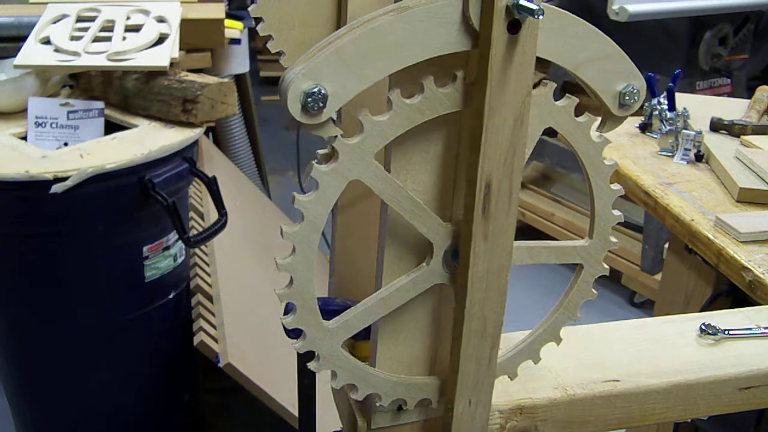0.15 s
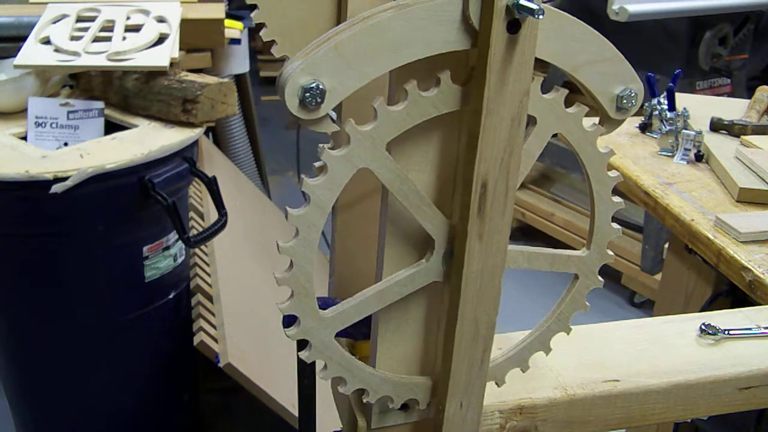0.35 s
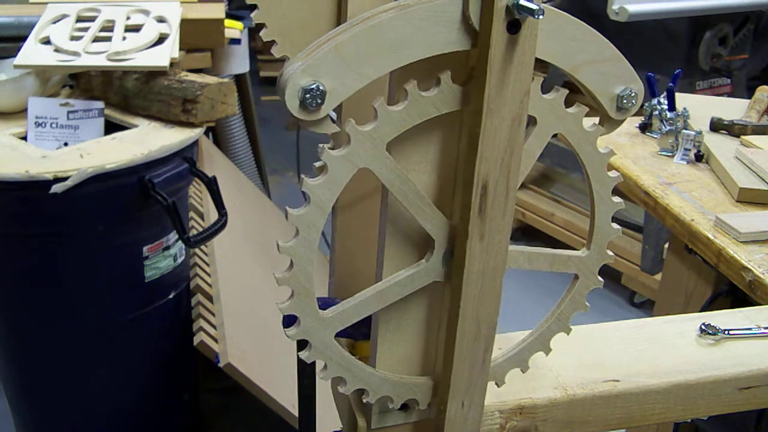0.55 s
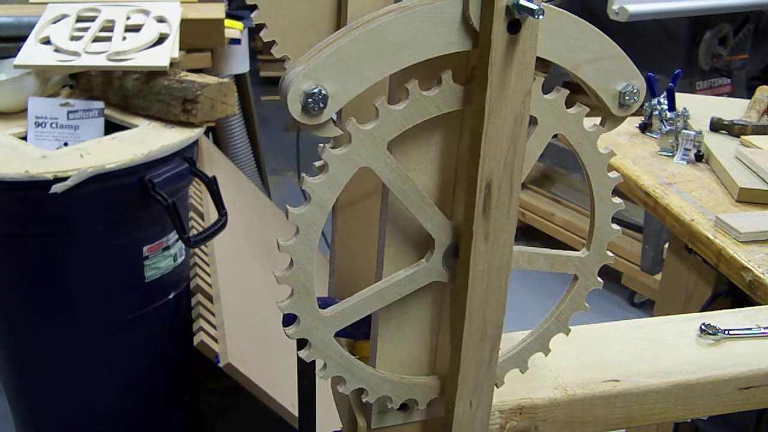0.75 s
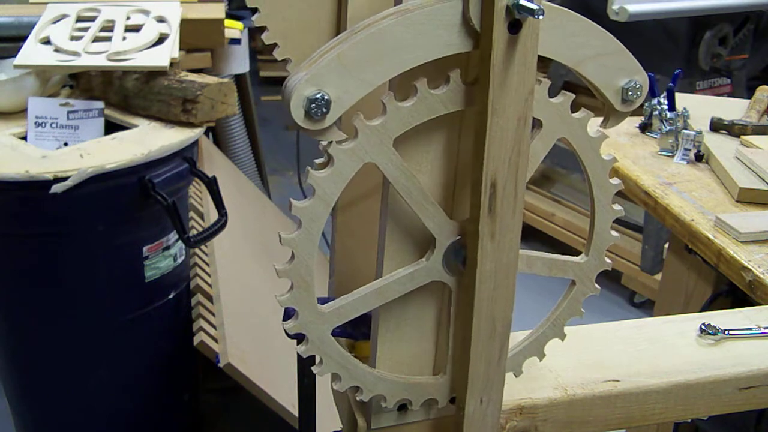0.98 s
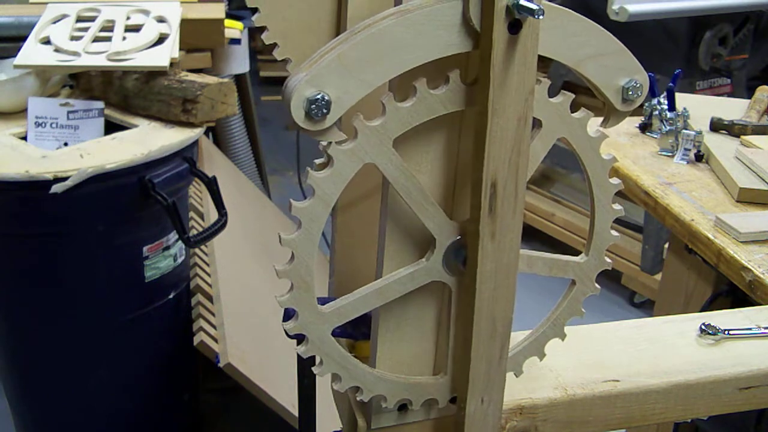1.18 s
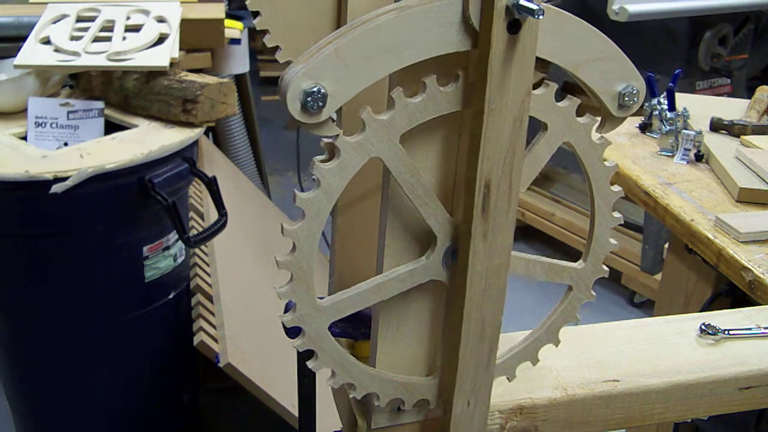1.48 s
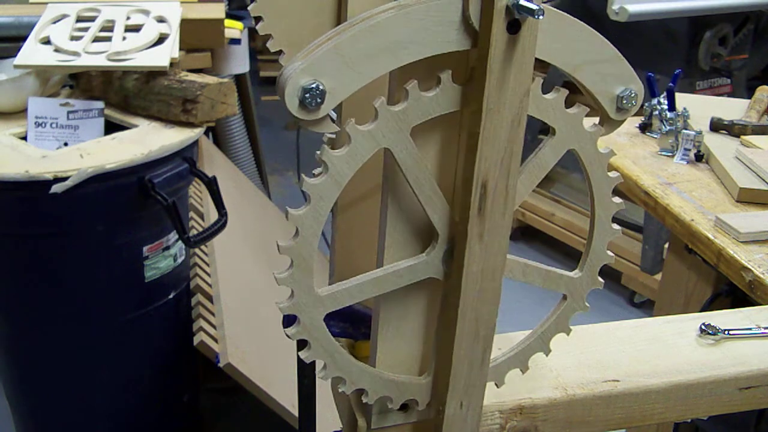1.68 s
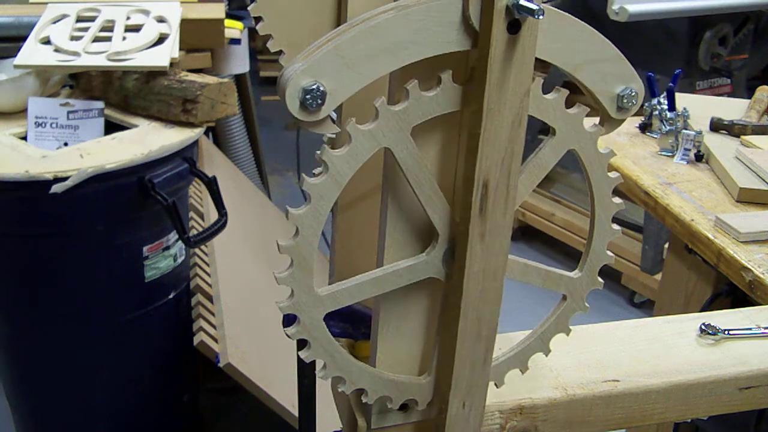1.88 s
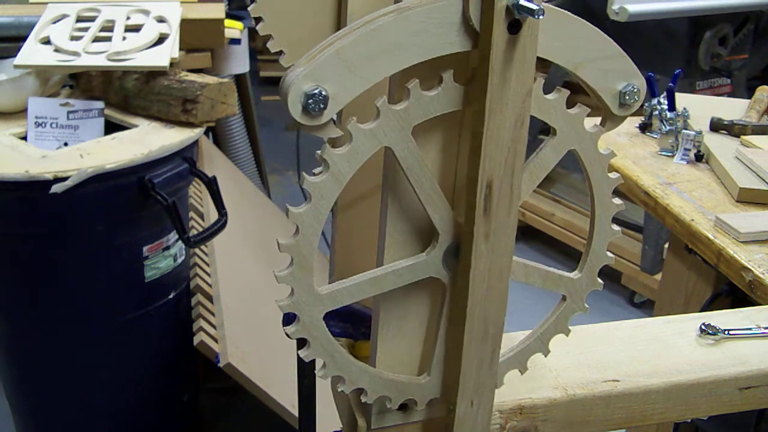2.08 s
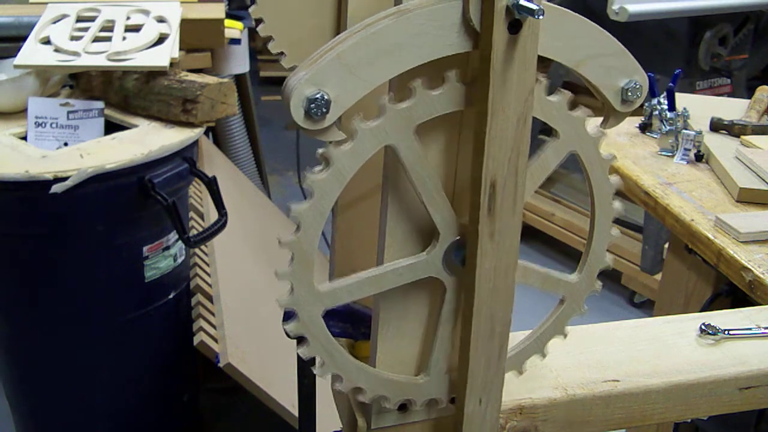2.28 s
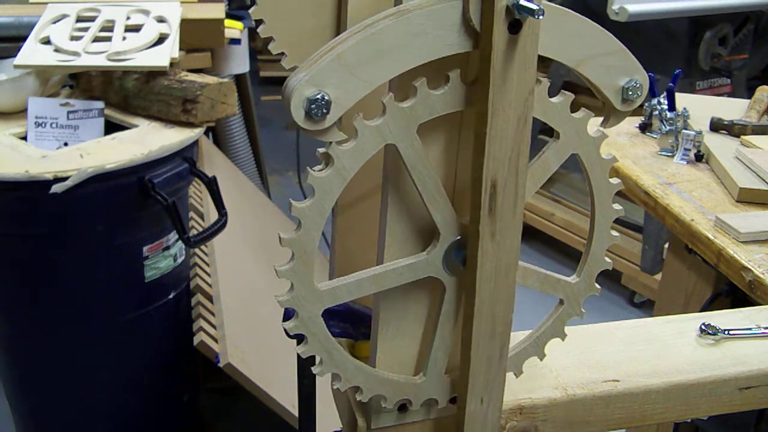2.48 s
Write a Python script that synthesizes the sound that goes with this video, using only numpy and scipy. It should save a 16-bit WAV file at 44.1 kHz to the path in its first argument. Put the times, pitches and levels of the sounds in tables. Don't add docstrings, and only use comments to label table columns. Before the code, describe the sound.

A big wooden gear knocks against its anchor four times, about 0.7 seconds apart, each a rattling clack with a soft low thud; one faint squeak follows the third. Close microphone, quiet workshop with low ventilation hum.

```python
import sys
import numpy as np
from scipy import signal
from scipy.fft import irfft
from scipy.io import wavfile
from scipy.ndimage import uniform_filter1d

SR = 44100
rng = np.random.default_rng(int(sys.argv[2]) if len(sys.argv) > 2 else 0)


def ratio_of_db(decibels):
    return 10 ** (np.asarray(decibels, float) / 20)


def to_wav(s):
    ch = np.atleast_2d(s).T
    pcm = np.round(np.clip(ch, -1, 1) * 32767)
    wavfile.write(sys.argv[1], SR, pcm.astype(np.int16))


N = 116865

FOCUS_DB = 5


def evened(x):
    return x / np.sqrt(np.mean(x ** 2) + 1e-20)


def read(points, hz):
    f, value = np.transpose(points)
    return np.interp(np.log(hz + 1), np.log(f + 1), value)


def add(mix, start_s, sound):
    part = mix[round(start_s * SR):][:len(sound)]
    part += sound[:len(part)]


def landings():
    # start_s, peak_db, focus_hz (most excited pitch)
    chatter = [
        [(.2392, -24, 2400), (.2404, -23, 2000), (.2427, -16.5, 1430), (.2452, -27, 2600), (.2470, -45, 2500),
         (.2486, -18, 1650), (.2512, -25, 2520), (.2535, -34.5, 2560), (.2550, -41, 1000)],
        [(.9773, -34, 3500), (.9789, -28, 1130), (.9808, -31.5, 2450), (.9824, -29, 3320), (.9838, -26.5, 730),
         (.9858, -27.5, 1500), (.9880, -31.5, 750), (.9903, -33, 890), (.9921, -31.5, 2400), (.9940, -40, 3910)],
        [(1.5629, -34.5, 2600), (1.5641, -14.5, 4720), (1.5652, -26.5, 3030), (1.5662, -22, 2000),
         (1.5705, -27, 940), (1.5770, -33, 1470), (1.5810, -43, 3000)],
        [(2.3279, -39.5, 1230), (2.3301, -31.5, 2000), (2.3318, -31.5, 744), (2.3330, -30, 3620),
         (2.3356, -31, 820), (2.3402, -46, 1190), (2.3420, -38, 5000), (2.3445, -38.5, 4200),
         (2.3480, -41, 935), (2.3525, -42.5, 4200)],
        [(.6243, -44.5, 2000), (.6272, -43, 2500), (.6300, -54, 2000), (.6325, -49, 2450), (.6365, -44, 2960),
         (.6395, -52, 1800), (.6450, -62, 2500)],
    ]
    teeth = [
        [0, -8, -2.5, -6, -8, -8.5, -13, -10, -13, -18, -17, -11, -14, -14.5],
        [0, -9.5, -11, -10, -11.5, -15.5, -15, -16, -19.5, -26.5, -30.5, -21.5, -22, -20.5],
        [2.5, -1, 4, 1.5, -1.5, -15.5, -6.5, -16.5, -16.5, -8.5, -28, -16.5, -12.5, -17.5],
        [2, -8.5, -4, -7, -7.5, -2, -11.5, -1, -8, -45.5, -21, -13.5, -8, -20],
        [11.5, -2.5, -1.5, 0, -6.5, -3.5, -14.5, -19, -27, -32, -28, -19.5, -21, -20.5],
    ]
    aside = [0, 1, -6.5, -1.5, -2]
    aside_hz, floor_hz = 3500, 280
    spread_s = 0.0022
    out = np.zeros((2, N))
    treble_filter = signal.butter(2, aside_hz, "high", fs=SR)
    for contacts, levels_db, aside_db in zip(chatter, teeth, aside):
        for start_s, peak_db, focus_hz in contacts:
            sound = ratio_of_db(peak_db) * blow(levels_db, focus_hz, spread_s)
            treble = signal.filtfilt(*treble_filter, sound)
            add(out[0], start_s - spread_s / 4, sound)
            add(out[1], start_s, sound + (ratio_of_db(aside_db) - 1) * treble)
    return signal.sosfilt(signal.butter(2, floor_hz, "high", fs=SR, output="sos"), out)


def blow(levels_db, focus_hz, spread_s):
    # pitch_hz, width_hz
    wheel = [(715, 39), (900, 138), (1430, 65), (1660, 62), (2020, 62), (2550, 78), (2920, 190),
             (3600, 280), (4150, 510), (4750, 270), (5400, 150), (6000, 120), (6480, 160), (7100, 740)]
    minor_db, ripple_db = -14, 3
    hz = np.fft.rfftfreq(4096, 1 / SR)
    f, width_hz = np.transpose(wheel)
    resonance = 1 / (1 + (2 * (hz[:, None] - f) / width_hz) ** 2)
    clear = (ratio_of_db(levels_db) ** 2 * resonance).sum(axis=1)
    bed = ratio_of_db(read(list(zip(f, levels_db)), hz) + minor_db) ** 2
    ripple = evened(uniform_filter1d(rng.standard_normal(len(hz)), size=14))
    focus_loss_db = FOCUS_DB * np.log2((hz + 20) / focus_hz) ** 2
    gain = np.sqrt(clear + bed) * ratio_of_db(ripple_db * ripple - focus_loss_db)

    log_gain = np.log(np.concatenate([gain, gain[-2:0:-1]]) + 1e-6)
    prompt = np.exp(np.conj(signal.hilbert(log_gain)))[:len(hz)]

    band = np.minimum(hz // 300, 29).astype(int)
    late_s = spread_s * rng.random(30)[band] ** 2
    lag = 2 * np.pi * hz[1] * np.cumsum(uniform_filter1d(late_s, size=25))
    return irfft(prompt * np.exp(-1j * lag))[:3000] / abs(irfft(prompt)).max()


def thuds():
    # start_s, level_db, rise_s, lowest_mode_db, upper_modes_db
    frame_blows = [
        (.250, -31.5, 0.0036, -4.5, 0.5),
        (.991, -34.5, 0.015, 1, 0),
        (1.573, -34, 0.0028, -5, -2.5),
        (2.344, -37.5, .013, 5, 4),
    ]
    # pitch_hz, level_db, t60_s
    frame_modes = [(142.4, -5.5, 0.29), (186.7, -1.5, 0.17), (218.9, -15.5, 0.12), (248.5, -16, 0.27),
                   (303.8, -9.5, 0.14), (356.3, -7.5, 0.15), (436.5, -17, 0.39), (611, -3.5, 0.056)]
    upper_hz = 240
    out, t = np.zeros(N), np.arange(SR // 2)[:, None] / SR
    hz, mode_db, t60_s = np.transpose(frame_modes)
    for start_s, level_db, rise_s, low_db, upper_db in frame_blows:
        loaded_db = mode_db + low_db * (hz == hz.min()) + upper_db * (hz > upper_hz)
        tones = np.sin(2 * np.pi * (hz * t + rng.random(len(hz))))
        modes = ratio_of_db(loaded_db - 60 * t / t60_s) * tones
        rise = 1 - np.exp(-(t / rise_s) ** 2)
        add(out, start_s, ratio_of_db(level_db) * (rise * modes).sum(axis=1))
    return out


def squeak():
    # start_s, level_db, length_s
    squeals = [(1.66, -66.5, 0.0074), (1.672, -57, 0.016), (1.686, -57, 0.012), (1.699, -57.5, 0.013),
               (1.711, -63, 0.019), (1.726, -66, .010), (1.736, -62.5, 0.0078), (1.74, -70, 0.028),
               (1.772, -64.5, 0.0086), (1.776, -68.5, .010), (1.790, -58.5, 0.004), (1.795, -62.5, 0.0064)]
    # pitch_hz, width_hz, level_db
    squeal_body = [(1660, 110, -8), (1920, 110, -10), (2535, 60, 0), (3420, 140, -16), (3800, 1200, -26),
                   (5600, 300, -29), (6700, 300, -31)]
    slip_hz, waver_share, roughness, clicks_per_s = 845, 0.03, 1.1, 3000
    loose = evened(rng.standard_normal(N) * (rng.random(N) < clicks_per_s / SR))
    waver = evened(uniform_filter1d(rng.standard_normal(N), size=300))
    cycles = np.cumsum(slip_hz * (1 + waver_share * waver)) / SR
    steady = evened(np.diff(np.floor(cycles), prepend=0))
    level = np.zeros(N)
    for start_s, level_db, length_s in squeals:
        swell = np.sqrt(np.hanning(round((length_s + 0.0035) * SR)))
        add(level, start_s - 0.002, ratio_of_db(level_db) * swell)
    return signal.oaconvolve((steady + roughness * loose) * level, ring(squeal_body))[:N]


def slips():
    # start_s, level_db, length_s
    scuffs = [(.131, -65, .01), (.210, -66, .02), (.623, -62, .02), (.921, -66, .015), (1.088, -68, .01),
              (1.162, -66, .01), (1.537, -67, .015), (1.798, -64, .01), (2.264, -67, .015)]
    # pitch_hz, width_hz, level_db
    scuff_body = [(725, 330, -15), (1530, 340, -0.5), (1920, 430, -5), (2720, 69, 3.5), (3320, 200, -3.5),
                  (4200, 350, -14.5), (5600, 230, -16), (7560, 1300, -19.5)]
    drive, t = np.zeros(N), np.arange(2000) / SR
    for start_s, level_db, length_s in scuffs:
        strength = rng.standard_normal(2000) * ratio_of_db(2.9 * rng.exponential(1, 2000))
        spray = strength * (rng.random(2000) < 0.08)
        add(drive, start_s, ratio_of_db(level_db) * evened(spray) * np.exp(-(t / length_s) ** 2))
    return signal.oaconvolve(drive, ring(scuff_body))[:N]


def ring(body, size=3000):
    t = np.arange(size)[:, None] / SR
    hz, width_hz, level_db = np.transpose(body)
    sign = (-1) ** np.arange(len(hz))
    decay = width_hz * np.exp(-np.pi * width_hz * t)
    modes = sign * ratio_of_db(level_db) * decay * np.sin(2 * np.pi * hz * t)
    return evened(modes.sum(axis=1)) / np.sqrt(size)


def shop(x):
    # pitch_hz, t60_s, level_db
    walls = [(151, 1, 6.5), (716, 0.25, -3.5), (2000, 0.25, -6), (4200, 0.24, -2), (5200, 0.37, -7.5),
             (7000, 0.14, -8.5)]
    gap_s, scatter_per_s = 0.00067, 150
    out, at = np.zeros(N), np.arange(0, SR - 20, 12)
    f, t60_s, level_db = np.transpose(walls)
    for k in range(3):
        taps = np.zeros(SR)
        taps[at + rng.integers(0, 12, len(at))] = rng.choice([-1., 1.], len(at))
        hz, t, z = signal.stft(taps, SR, nperseg=256)
        start_db = read(list(zip(f, level_db)), hz)[:, None]
        decay_s = read(list(zip(f, t60_s)), hz)[:, None]
        tail = signal.istft(z * ratio_of_db(start_db - 60 * t / decay_s), SR, nperseg=256)[1]
        tail = tail * np.clip(np.arange(len(tail)) / SR / gap_s, 0, 1) ** 2
        turn = np.cos(np.pi * (scatter_per_s * np.arange(N) / SR + k / 3))
        out += signal.fftconvolve(x * turn, tail / np.linalg.norm(tail))[:N]
    return out


def air():
    # pitch_hz, level_db (per Hz)
    air_colour = [(25, -21), (64, -35.5), (78, -11), (180, -13), (312, -27), (1140, -28), (2200, -35),
                  (8000, -51.5)]
    # pitch_hz, width_hz, level_db
    ducts = [(79.5, 28.4, 10.5), (120.8, 11.2, 8.5), (223.5, 21.3, 9), (362.6, 136, 6), (712, 132, 9),
             (1130, 174, 6), (1537, 130, 4)]
    # time_s, level_db
    draught = [(0, 0.8), (.5, -0.2), (1.0, 0.2), (1.45, 0.3), (1.85, -0.9), (2.2, -1.8), (2.65, 0.2)]
    air_db, patch_db = -53, 0.9
    frames, hz = N // 2048 + 5, np.fft.rfftfreq(8192, 1 / SR)
    a, b, patches = rng.standard_normal((frames, 4097, 3)).T
    patches = evened(uniform_filter1d(patches, 80, 0))
    colour_db = read(air_colour, hz)
    for f, width_hz, level_db in ducts:
        colour_db = colour_db + level_db * np.exp(-((hz - f) / width_hz) ** 2)
    z = (a + 1j * b) * ratio_of_db(colour_db[:, None] + patch_db * patches)
    noise = signal.istft(z, nperseg=8192, noverlap=6144)[1][4096:N + 4096]
    swell_db = np.interp(np.arange(N) / SR, *np.transpose(draught))
    return ratio_of_db(air_db + swell_db) * evened(noise)


def scene():
    near, aside = landings()
    rubbing = slips() + squeak()
    echo = ratio_of_db(-11) * shop(aside + rubbing)
    return (near + rubbing + echo + thuds() + air())[None]


def top_cut(x):
    return signal.sosfilt(signal.butter(12, 8900, fs=SR, output="sos"), x)


def record(dry):
    notch_hz, notch_wide_hz, notch_depth = 478.4, 87, 0.89
    edge_hz, edge_wide_hz, edge_db = 7500, 160, -22
    hiss_db = -89.5
    r, c = np.exp(-np.pi * notch_wide_hz / SR), np.cos(2 * np.pi * notch_hz / SR)
    q = 1 - (1 - r) * (1 - notch_depth)
    dipped = signal.lfilter([1, -2 * q * c, q * q], [1, -2 * r * c, r * r], dry)
    hz = np.linspace(0, SR / 2, 400)
    slope = np.clip((edge_hz - hz) / edge_wide_hz, -50, 50)
    step = signal.firwin2(255, hz, ratio_of_db(edge_db / (1 + np.exp(slope))), fs=SR)
    hiss = ratio_of_db(hiss_db) * rng.standard_normal(dry.shape)
    return top_cut(signal.oaconvolve(dipped, step[None], "same") + hiss)


dry = scene()
out = record(dry)
to_wav(out)
```